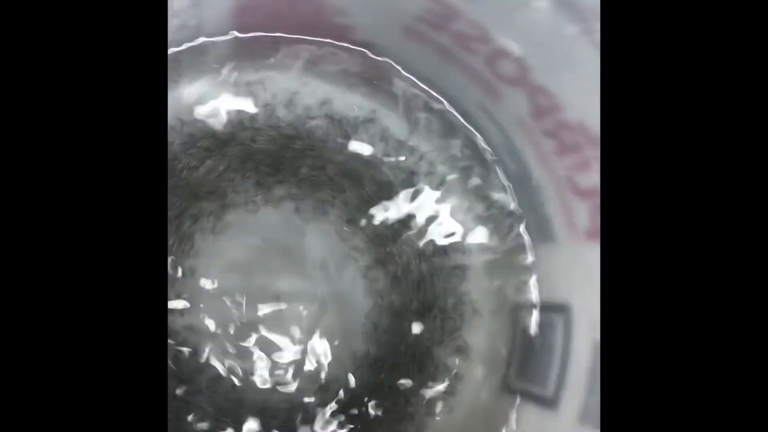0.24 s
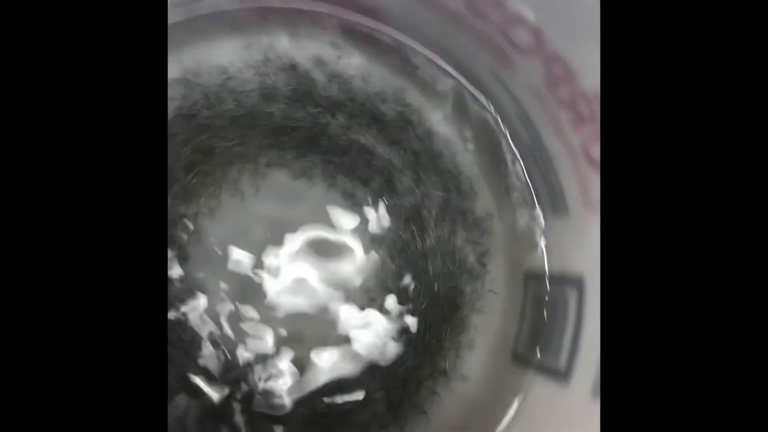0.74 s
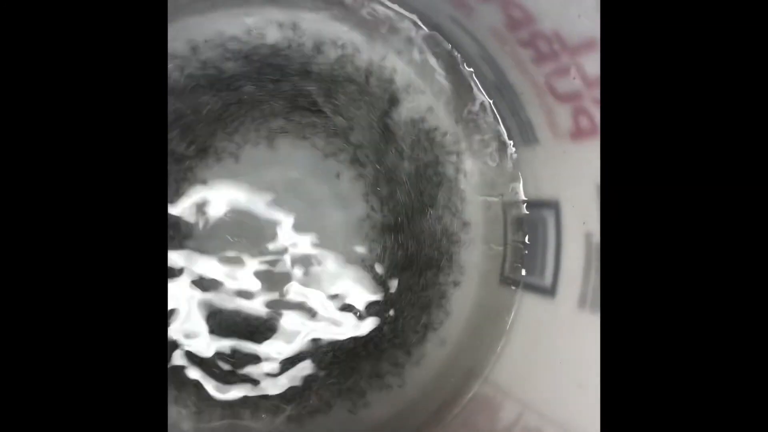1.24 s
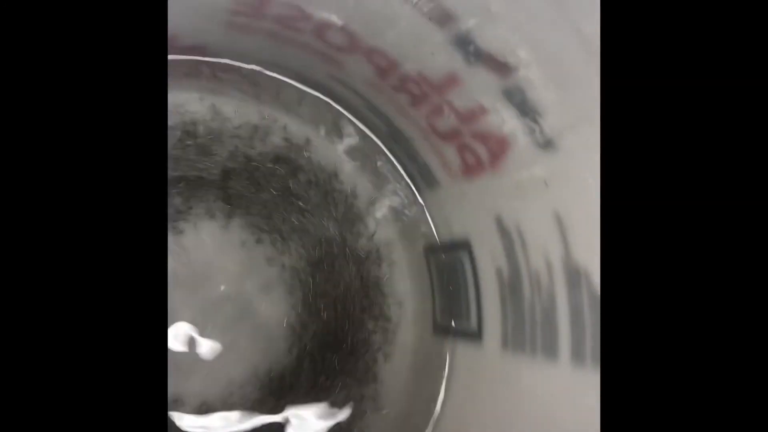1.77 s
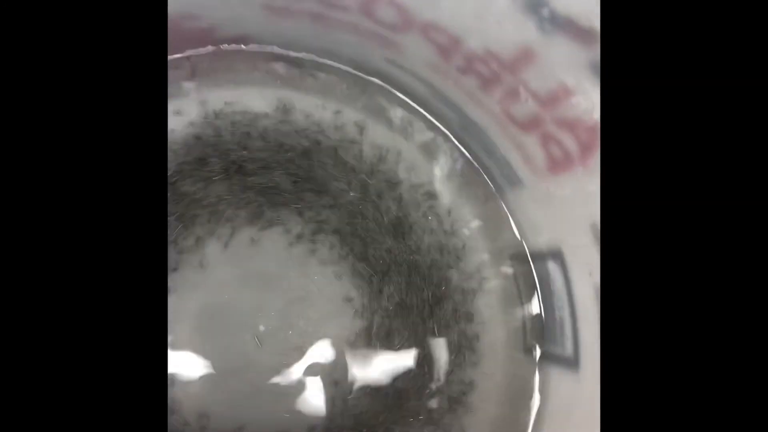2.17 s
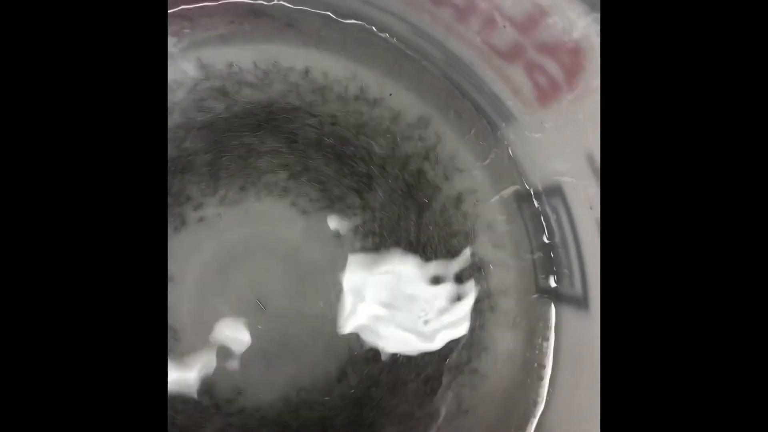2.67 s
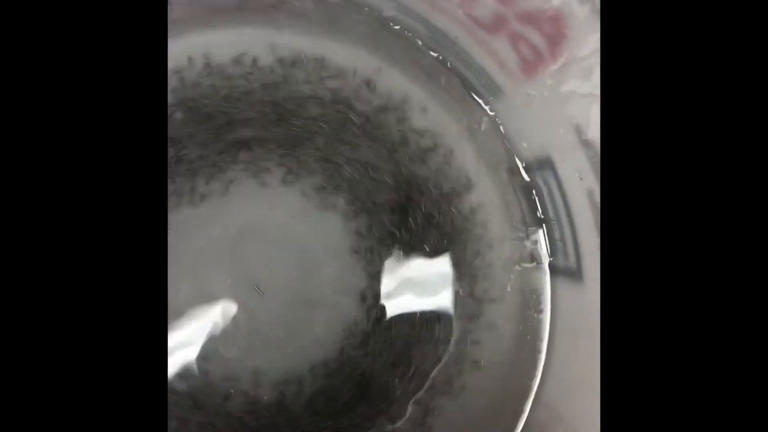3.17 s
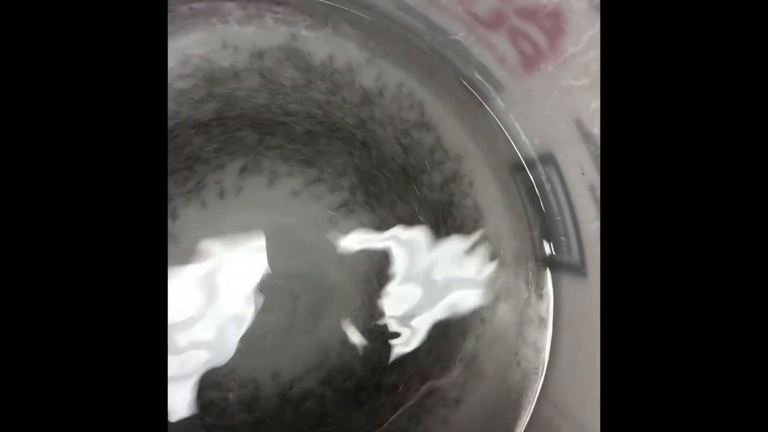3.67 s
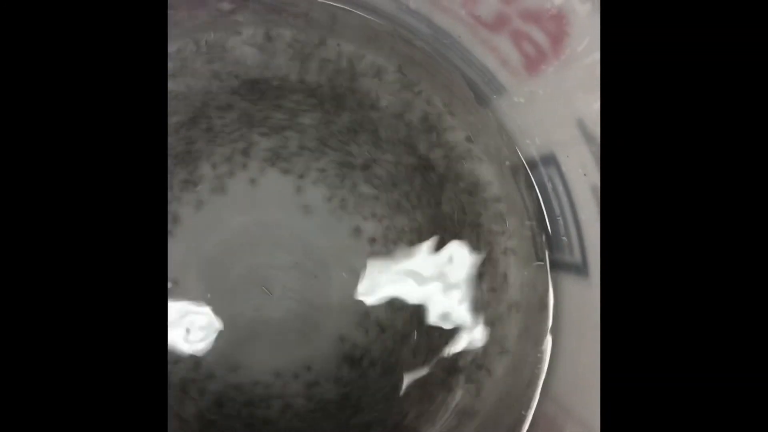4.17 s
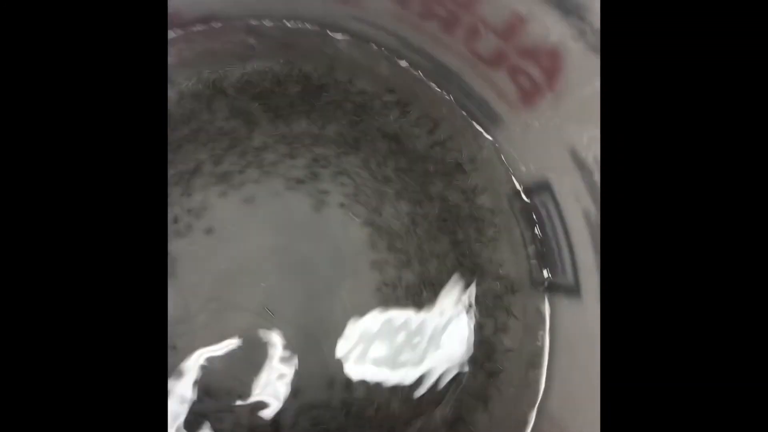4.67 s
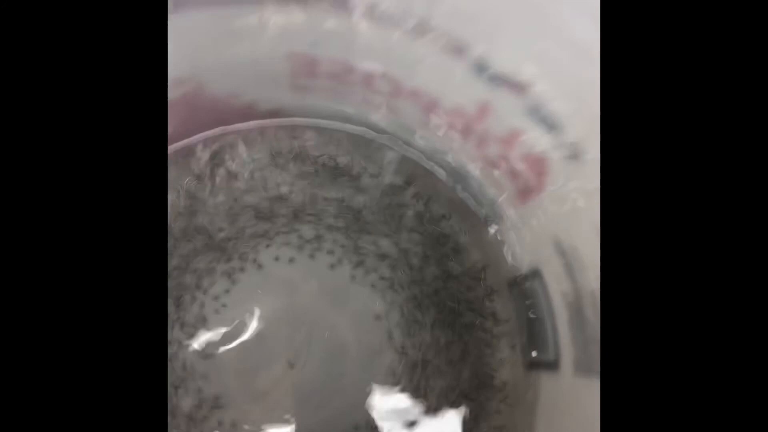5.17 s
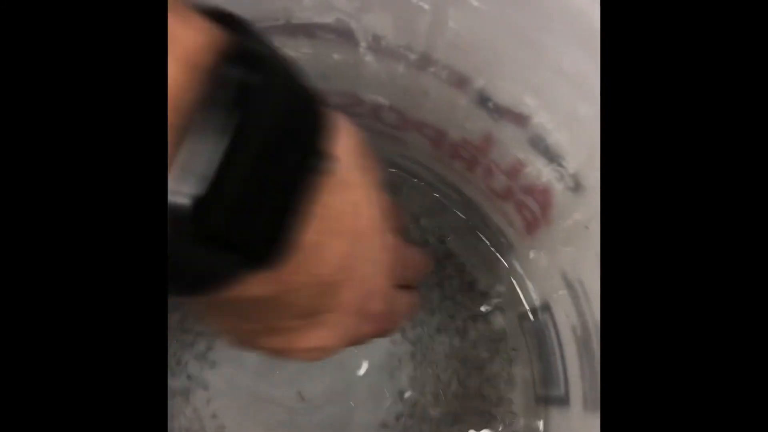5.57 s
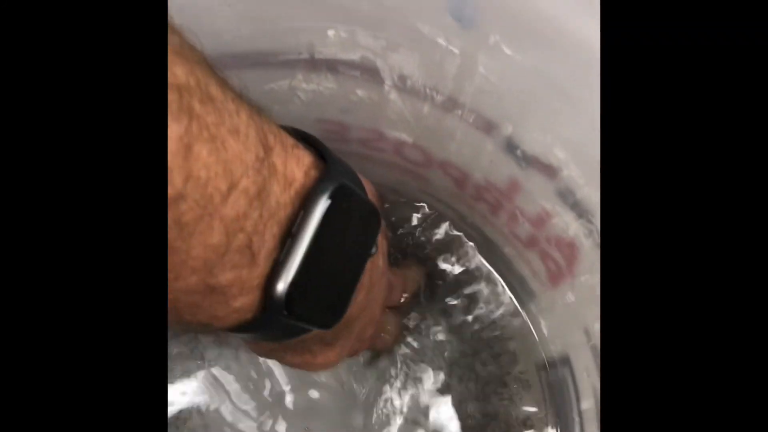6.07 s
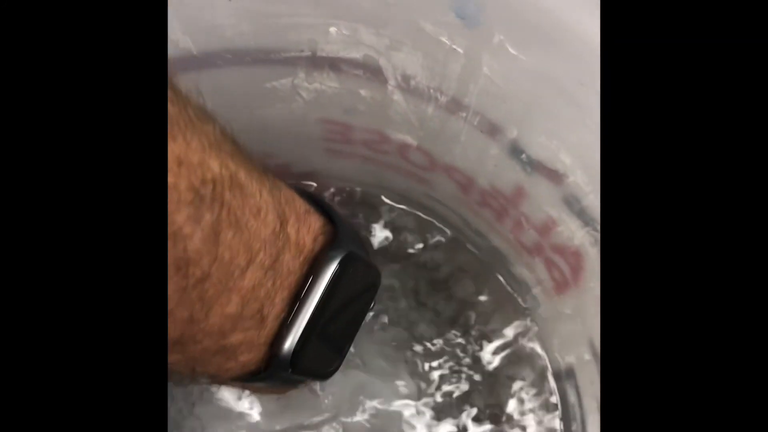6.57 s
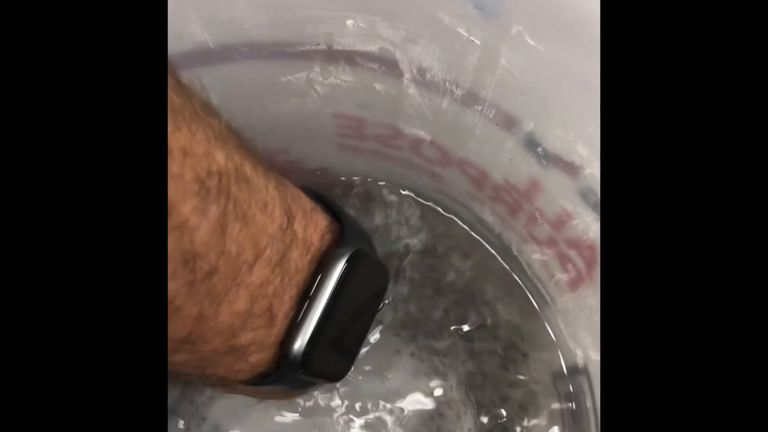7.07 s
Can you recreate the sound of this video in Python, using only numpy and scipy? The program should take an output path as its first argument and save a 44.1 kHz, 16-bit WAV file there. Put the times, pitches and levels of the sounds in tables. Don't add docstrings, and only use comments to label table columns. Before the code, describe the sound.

Close, hand-held capture in a small workshop: countless small metal pins spin in water, making a steady bright rustling whir with no separate clinks. Ringing tones near the upper midrange strengthen as the microphone hovers over the water, then shift as it draws back. Finally a hand goes in, muffling the shimmer and bringing out a lower, boxy resonance. A weak motor drone stays underneath.

```python
import sys
import numpy as np
from scipy import signal
from scipy.fft import rfft, irfft
from scipy.io import wavfile
from scipy.ndimage import uniform_filter1d

SR = 44100
rng = np.random.default_rng(int(sys.argv[2]) if len(sys.argv) > 2 else 0)


def master_out(mix):
    frames = np.transpose(np.atleast_2d(mix))
    ceiling = np.clip(frames, -1, 1)
    pcm = np.round(ceiling * 32767).astype(np.int16)
    wavfile.write(sys.argv[1], SR, pcm)


def how_loud(loudness_db):
    steps = np.asarray(loudness_db, float) / 20
    return 10 ** steps


N = 323730
BLOCK_START = 821


def evened(x):
    return x / np.sqrt(np.mean(x ** 2) + 1e-20)


def wander(rate_hz):
    pole = np.exp(-2 * np.pi * rate_hz / SR)
    noise = rng.standard_normal(N + SR)
    return evened(signal.lfilter([1], [1, -2 * pole, pole ** 2], noise)[SR:])


# (time [s], place [0-3 along the bucket, 4 = hand in the water])
PLACE = [
    (0, 0),
    (1.05, .1),
    (1.45, 1),
    (1.65, 1.1),
    (2.0, 2),
    (4.6, 2),
    (4.95, 3),
    (5.12, 3),
    (5.5, 4),
    (7.34, 4),
]


def microphone_place():
    return np.interp(np.arange(N) / SR, *np.transpose(PLACE))


def by_place(values):
    return np.interp(microphone_place(), np.arange(len(values)), values)


def ticks(throb_db=0.37, surge_db=0.4, gust_db=0.27):
    strikes = rng.standard_normal(N) * (rng.random(N) < .75)
    pole_hz = 51.9 * (1 + 0.01 * wander(1.1))
    poles = np.cos(2 * np.pi * np.cumsum(pole_hz) / SR)
    force_db = throb_db * poles + surge_db * wander(21.0) + gust_db * wander(60.)
    return evened(strikes * how_loud(force_db))


def ringing(modes, low_db, high_db, ripple_db=.9, size=8192):
    hz = abs(np.fft.fftfreq(size, 1 / SR))
    high = 1 / (1 + (3500 / (hz + 1)) ** 16)
    power = how_loud(2 * low_db) * np.minimum(hz / 600, 1) ** 4 + how_loud(2 * high_db) * high
    for mode_hz, width_hz, db in modes:
        power = power + how_loud(2 * db) / (1 + (2 * (hz - mode_hz) / width_hz) ** 2) ** 2
    ripple = uniform_filter1d(rng.standard_normal(size), size=9)
    ripple = evened(uniform_filter1d(ripple, size=9))
    ripple /= np.sqrt(1 + (hz / 9000) ** 2)
    mirrored = ripple[np.round(hz * size / SR).astype(int)]
    log_gain = np.log(np.sqrt(power + 1e-9) * how_loud(ripple_db * high * mirrored))
    spectrum = np.exp(np.conj(signal.hilbert(log_gain)))
    taps = np.fft.ifft(spectrum).real[:size // 2]
    return taps / np.linalg.norm(taps)


def drift(x, patch_db=.9, frames_size=40, bins_size=3):
    z = signal.stft(x, nperseg=1024, noverlap=768)[2]
    patches = uniform_filter1d(rng.standard_normal(z.shape), bins_size, 0)
    patches = uniform_filter1d(patches, frames_size, 1)
    gain = how_loud(patch_db * evened(patches))
    return evened(signal.istft(z * gain, nperseg=1024, noverlap=768)[1][:N])


# (frequency [Hz], width [Hz], near the rim [dB], sinking in [dB], over the water [dB], drawing back [dB])
WALL = [(560, 95, -17.5, -15, -18, -20), (750, 44, 1.5, -2.5, -8, -9), (796, 66, 4, -0.5, -2.5, -5.5),
        (926, 147, -4, -7, -5.5, -12), (1138, 117, -1.5, -5.1, -5, -11), (1186, 62, -1, -9.0, -27, -11),
        (1477, 140, 0.2, 0, 0.1, -3), (1515, 73, -6, 0, -2.5, -4), (1638, 76, 4, 4, 5, -3),
        (1730, 230, 2, 0.5, -5, -3), (1894, 120, 2, 2, 4, 2), (2168, 135, -3.5, -18, -5, -8),
        (2423, 230, -10, -7.5, -7.5, -14), (2590, 230, -8, -14, -28, -6), (2681, 49, 4.5, 4.5, 0, -11),
        (2960, 320, -6, -9.5, -31, -7), (3255, 114, -6.3, -4, -1, -8), (3500, 160, -6.5, -6, -12, -8)]
AIR = [(3700, 660, -11, -9, -6.5, -25.0), (3830, 200, -6.5, -16, -25.0, -7), (4010, 38, -7, 0, -1.5, -9),
       (4290, 220, -4.5, -9, -9.5, -11), (4594, 180, -3, -11, -6.5, -4), (4850, 530, -6.5, -5.5, -15, -10),
       (5170, 210, -12.0, -10, -11, -2), (5314, 166, -3.5, -3.5, -1.2, -7),
       (5820, 360, -8.5, -5, -12.5, -6.5), (6200, 136, -2.5, -8.5, -3, -6),
       (6560, 530, -6.6, -8.7, -10, -9), (6890, 140, -20.6, -1.5, -5, -10), (7110, 400, -8, -13, -11, -7.0),
       (7400, 420, -6.8, -2.5, -7, -11),
       (7780, 260, -5.5, -4, -6.5, -5), (8340, 260, -5.5, -9, -6.5, -13.3),
         (8540, 690, -14, -14, -24, -6.5), (8840, 470, -8, -11, -8.5, -25.0),
         (9450, 750, -10, -9, -15.5, -12), (10380, 790, -7, -7, -11, -10.1), (11050, 640, -8, -6, -9, -8.7),
         (11580, 630, -2.0, -3.5, -6, -0.5), (12250, 620, -3, -2.5, -11, -25.0),
         (12650, 450, -20, -8, -9, -8), (12850, 630, -7.8, -8.6, -8.8, -8), (13700, 550, -7, -9.5, -11, -9),
         (14700, 700, -9, -10, -14, -8), (15000, 740, -8.2, -9.3, -13, -13.7)]
CROSS = [(4990, 70, -14, -14, -9, -12), (5290, 49, -11, -2, 0.5, -10), (5470, 55, -14, -13, -3.5, -12),
         (5760, 83, -6, -12, -5, -14), (7870, 90, -10, -8, -3, -12), (9020, 120, -10, -7, -4.5, -14),
         (11525, 210, -9, -7, -2, -10), (12530, 90, -5, -10, -10, -12), (13780, 180, -15, -14, -7, -16),
         (16100, 840, -6, -11, -10, -10)]
# (frequency [Hz], width [Hz], level [dB])
HAND = [(543, 115, -21), (781, 88, -4), (934, 290, -9.5), (1175, 110, -5.5), (1423, 96, -2.2),
        (1637, 190, 2), (1730, 58, -11), (1900, 110, 1.5), (2105, 200, -5), (2210, 108, -16),
        (2390, 172, -11), (2580, 150, -2.0), (2800, 51, 0.5), (2940, 320, -4), (3244, 1100, -14),
        (3415, 150, -4.5), (3760, 76, -3), (4260, 180, -9.5), (4607, 220, -7), (4840, 150, -5),
        (5230, 220, -3.5), (5640, 300, -14), (6100, 320, -16), (7500, 1600, -10), (8300, 223, -11),
        (11670, 1344, -4), (12755, 813, -14)]
PINS_DB = (-13, -13.5, -13.5, -14, -13)


def bucket_modes(hits):
    free = np.array(WALL + AIR + CROSS)
    bodies = [ringing(free[:, [0, 1, 2 + k]], -48.0, -14.5) for k in range(4)]
    bodies.append(ringing(HAND, -30.0, -9.5))
    place, heard = microphone_place(), np.zeros(N)
    for k, body in enumerate(bodies):
        nearness = np.maximum(1 - abs(place - k), 0)
        heard += signal.oaconvolve(hits * nearness, body)[:N]
    return how_loud(by_place(PINS_DB)) * rim_echo(drift(heard))


def sing(hits, modes, place_db, swells, factor=1):
    t, out = np.arange(N) / SR, np.zeros(N)
    for hz, width_hz in modes:
        turn = np.exp(2j * np.pi * np.cumsum(hz * factor * np.ones(N)) / SR)
        pole = np.exp(-np.pi * width_hz / SR)
        elsewhere = np.roll(hits, rng.integers(N))
        envelope = signal.lfilter([1], [1, -2 * pole, pole ** 2], elsewhere / turn)
        out += evened((turn * envelope).real)
    swell_db = sum(db * np.exp(-((t - s) / half) ** 2) for s, db, half in swells)
    return how_loud(by_place(place_db) + swell_db) * evened(out)


# (time [s], level [dB], half length [s])
PAIR = [((2800, 48), (2880, 51)), (-33.5, -28.5, -23, -28.5, -45), [(2.15, 3, 0.31), (4.58, 3.5, 0.17),
        (5.13, 7.5, 0.15), (5.33, 12, 0.066)]]
CORE = [((2838, 28),), (-40, -36, -33, -36, -55), [(2.12, 12, 0.26), (4.62, 16, 0.17), (5.12, 10, 0.15)]]
RIM = [((2142, 48),), (-32.5, -34.5, -30, -39, -52), [(0, 6, .3), (2.2, -5, .12), (3.0, 4.5, .3),
       (4.05, 6, .4)]]
LIP = [((3465, 60),), (-42, -39, -34, -47, -52), [(4.6, 3.5, .3)]]
WRIST = [((1195, 42),), (-60, -60, -60, -53, -35), [(6.65, 5.4, 0.26)]]
PALM = [((3420, 52),), (-60, -60, -60, -60, -40), [(6.65, 9.8, .5)]]
BELLY = [((700, 22),), (-80, -80, -80, -47, -33), [(6.0, 1.6, .3), (5.3, 9.1, .12)]]


def strong_modes(hits):
    steady = sum(sing(hits, *mode) for mode in (PAIR, CORE, RIM, LIP, WRIST, PALM))
    sink_s, settle_s, pitch_share = 5.22, .45, 0.112
    still_free = np.clip(1 - (np.arange(N) / SR - sink_s) / settle_s, 0, 1)
    return steady + sing(hits, *BELLY, 1 + pitch_share * still_free)


# (frequency [Hz], level per Hz [dB])
DRONE = [(12, -61), (20, -31), (59, -28), (86, -18.5), (146, -12.5), (187, -8), (217, -8), (263, -0.5),
         (301, -11.5), (332, -9), (460, -18.5), (486, -10), (520, -6.5), (680, -48), (1140, -120)]
# (start [s], end [s], frequency [Hz], wavering [Hz], rms level [dB])
TONES = [(0, 4.4, 93, 3.2, -64), (4.5, 7.4, 30.5, 1.5, -70), (4.45, 5.05, 125.5, 5.4, -53),
         (5.2, 7.4, 119, 2.7, -62.5), (5.5, 7.4, 162, 2.7, -55), (0, 1.9, 217, 6, -53.5),
         (1.7, 3.8, 226, 5, -48.5), (3.5, 4.3, 220, 8, -46.5), (4.5, 4.75, 208, 7, -47),
         (5, 7.4, 210.5, 2, -44), (2, 3.3, 254, 4.6, -54.5), (1.8, 1.96, 265, 8.3, -48),
         (3, 6.2, 269, 5.3, -53), (0, 3.3, 555.5, 1.8, -50), (-1, 3.4, 585.5, 4, -52),
         (1.5, 3.4, 613.5, 2.7, -56.5), (5.2, 7.4, 576, 3, -55.5), (6, 7, 506, 7.1, -51.5)]


def motor():
    table_hz, table_db = np.transpose(DRONE)
    hz = np.fft.rfftfreq(N, 1 / SR)
    gain = how_loud(np.interp(np.log(hz + 1), np.log(table_hz + 1), table_db))
    out = evened(irfft(rfft(rng.standard_normal(N)) * gain, N))
    level_db = by_place((-45, -45.5, -46.5, -43.5, -46.5))
    out *= how_loud(level_db + 1.5 * wander(2))
    t = np.arange(N) / SR
    for start, end, tone_hz, width_hz, db in TONES:
        turns = 2 * np.pi * tone_hz * t
        fade = np.clip(np.minimum(t - start, end - t) / .15 + .5, 0, 1)
        tone = (2.7 + wander(width_hz)) * np.cos(turns) + wander(width_hz) * np.sin(turns)
        out += how_loud(db) * fade * evened(tone)
    return out


# (middle [s], half length [s], share [ratio], delay [ms], change of delay [ms/s])
SWINGS = [
    (1.3, .3, 0.17, .9, -0.53),
    (5.048, 0.18, 0.35, .47, 0.24),
]


def rim_echo(x):
    t, out = np.arange(N) / SR, x
    for s, half, share, delay_ms, slide_ms in SWINGS:
        near = share * np.exp(-((t - s) / half) ** 2)
        delay_s = np.clip(delay_ms + slide_ms * (t - s), 0, 2) / 1000
        late = np.interp(t - delay_s, t, x)
        out = (out + near * late) / np.sqrt(1 + near ** 2)
    return out


def scene():
    hits = ticks()
    pins = bucket_modes(hits) + strong_modes(hits)
    return np.tile(pins + motor(), (2, 1))


FILL_S = [.251, .738, .947, .994, 1.017, 1.11, 1.481, 1.714, 2.782, 3.966, 4.198, 5.336, 5.591, 5.731,
          6.451, 6.543, 6.729, 6.752, 7.101, 7.263]


def noise_fills(mid, share=0.59, size=2048):
    side, n = np.zeros(N + size), np.arange(size)
    window = signal.windows.kaiser_bessel_derived(size, 4 * np.pi)
    for s in FILL_S + FILL_S[::2]:
        low_hz, wide_hz = rng.uniform(4100, 14400), 1450
        at = BLOCK_START + round((s * SR - BLOCK_START) / (size / 2) - 1) * size // 2
        bins = round(low_hz * size / SR) + np.arange(round(wide_hz * size / SR))
        phases = 2 * np.pi / size * np.outer(bins + .5, n + .5 + size / 4)
        waves = window * np.cos(phases)
        level = np.sqrt(np.mean((waves @ mid[at:at + size]) ** 2)) * 4 / size
        side[at:at + size] += share * level * rng.standard_normal(len(bins)) @ waves
    return side[:N]


def top_cut(x):
    return signal.sosfilt(signal.butter(12, 17080, fs=SR, output="sos"), x)


def record(dry):
    dry = dry / (1 + abs(dry / .9) ** 6) ** (1 / 6)
    low_pass = signal.firwin(2047, 15770, window=("kaiser", 11), fs=SR)
    dry = signal.oaconvolve(dry, low_pass[None], "same")
    side = noise_fills(dry[0])
    return top_cut(dry + np.array([side, -side]))


dry = scene()
out = record(dry)
master_out(out)
```